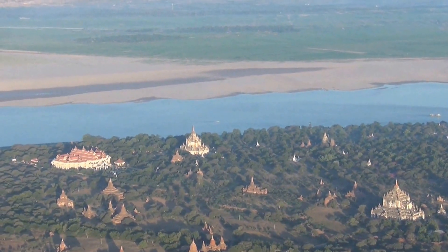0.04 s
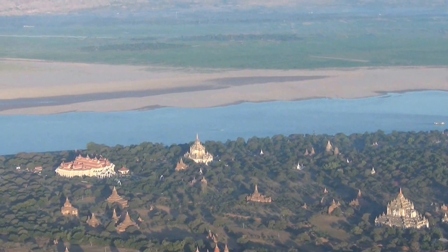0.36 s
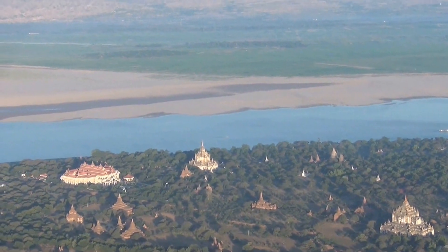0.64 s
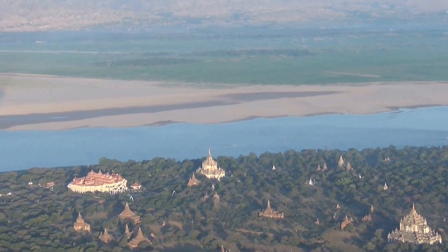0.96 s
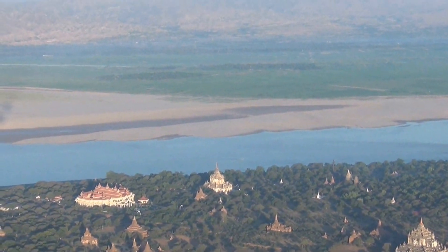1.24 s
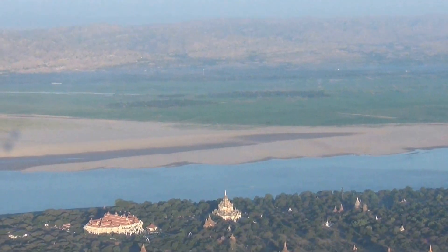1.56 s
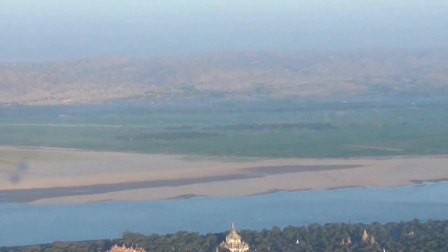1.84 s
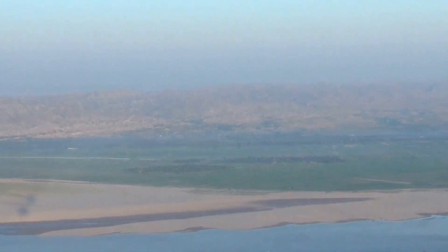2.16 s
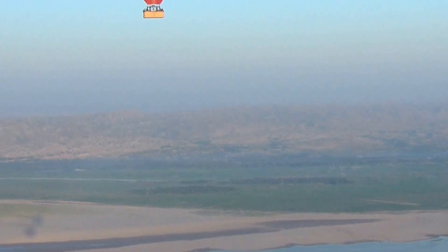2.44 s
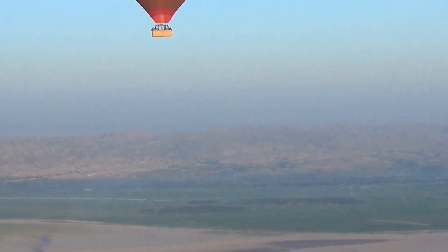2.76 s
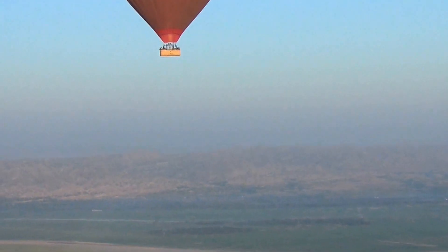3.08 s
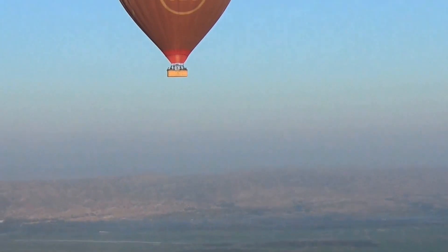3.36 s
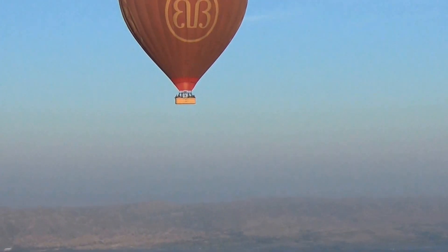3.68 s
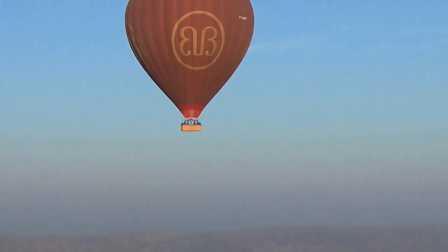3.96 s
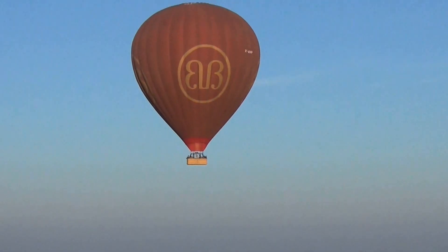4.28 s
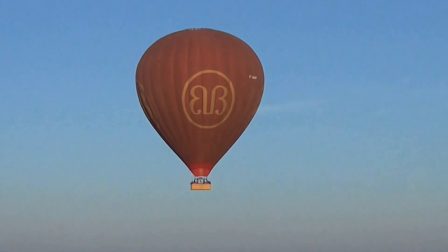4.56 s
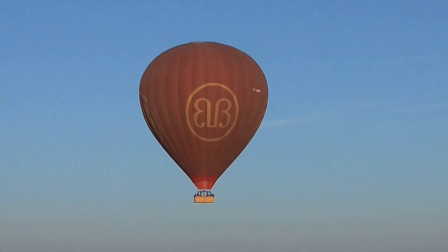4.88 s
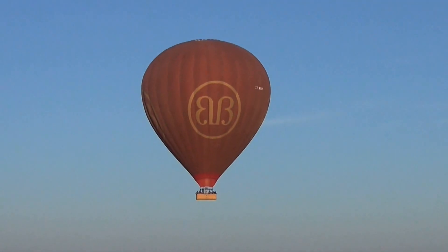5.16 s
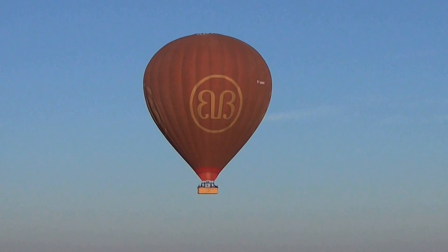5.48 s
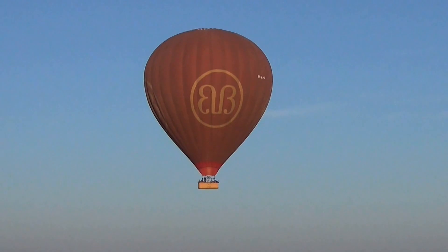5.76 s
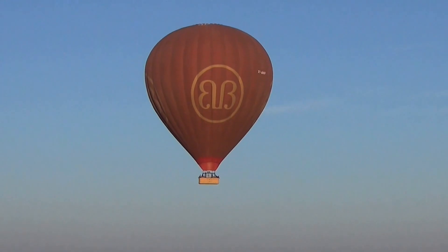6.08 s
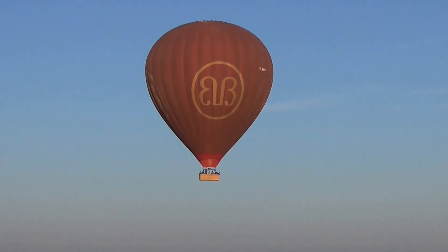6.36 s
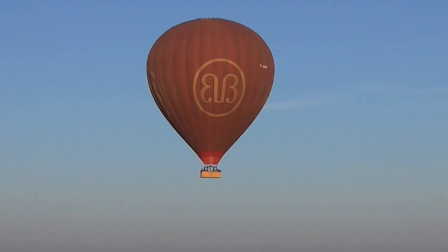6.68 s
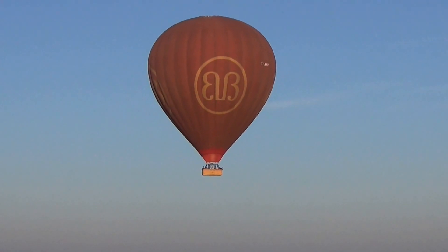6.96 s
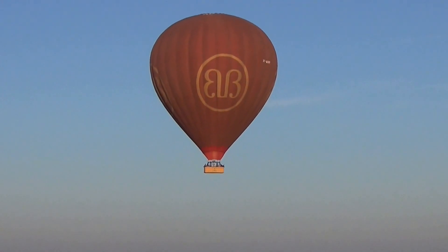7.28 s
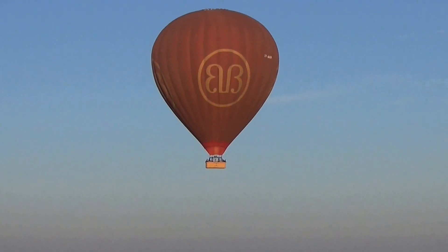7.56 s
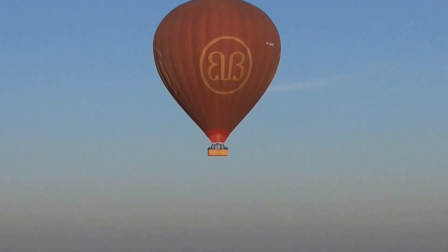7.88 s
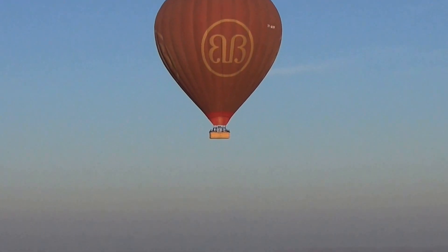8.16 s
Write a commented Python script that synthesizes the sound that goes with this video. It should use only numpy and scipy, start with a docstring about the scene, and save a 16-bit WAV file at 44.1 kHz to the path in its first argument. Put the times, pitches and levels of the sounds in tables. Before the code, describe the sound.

After a brief distant burner blast, a close balloon burner flares up and holds a loud, hissing roar, then dies away.

```python
"""In the basket of a hot-air balloon: quiet air, a faint whistle, then a short blast from a distant
burner on the right. The burner overhead lights with a flare and a whump, and roars on: its swirling
flame rumbles and rushes while propane hisses out of the nozzles. The camera tilts up towards it, and
its gain control (an automatic volume knob) holds the roar down. Near the end the gas valve is eased
back, then shut, and the roar dies away."""
import sys
import numpy as np
from scipy import signal
from scipy.fft import rfft, irfft, next_fast_len
from scipy.io import wavfile
from scipy.ndimage import uniform_filter1d, minimum_filter1d, map_coordinates

SR = 44100
rng = np.random.default_rng(int(sys.argv[2]) if len(sys.argv) > 2 else 0)


def file_out(sig):
    """Save sig as 16-bit WAV at sys.argv[1]."""
    # one column per channel
    cols = np.atleast_2d(sig).T
    # limit, then scale
    lim = np.clip(cols, -1, 1)
    pcm = np.round(lim * 32767).astype(np.int16)
    wavfile.write(sys.argv[1], SR, pcm)


N = 367353

OPEN_S, EASE_S, SHUT_S = 0.91, 7.22, 8.06  # the gas valve snaps open, is eased back, then shuts


def amp(db):
    """Turn decibels into a number to multiply a sound by."""
    return 10 ** (np.asarray(db) / 20)


def unit(pair):
    """Scale a stereo sound so that the average of its two sides has a power of 1."""
    return pair / np.sqrt(np.mean(pair.mean(0) ** 2) + 1e-20)


def since(start_s):
    """Seconds gone by since a moment, 0 before it."""
    return np.maximum(np.arange(N) / SR - start_s, 0)


def onset(at_s, rise_s):
    """A smooth step from 0 to 1, half way up at the given moment."""
    return (1 + np.tanh((np.arange(N) / SR - at_s) / (2 * rise_s))) / 2


def wobble(per_s):
    """A smooth curve through per_s random values a second."""
    points = rng.standard_normal(int(N * per_s / SR) + 4)
    return map_coordinates(points, [np.arange(N) * per_s / SR])


def filtered(x, response):
    """Turn each frequency of a sound up or down by response(hz)."""
    size = next_fast_len(N + 8192)
    return irfft(rfft(x, size) * response(np.fft.rfftfreq(size, 1 / SR)), size)[..., :N]


def split(x, edge_hz, order=6):
    """The low and the high part of a sound; a higher order divides them more sharply."""
    low = filtered(x, lambda hz: 1 / (1 + (hz / edge_hz) ** order))
    return low, x - low


def shifted(x, shift_hz):
    """Slide a band of noise up or down in frequency."""
    spin = np.exp(2j * np.pi * np.cumsum(shift_hz) / SR)
    return np.real(signal.hilbert(x, next_fast_len(N))[:, :N] * spin)


def evened(x, span_s, share):
    """Take a share of the swells and lulls out of a noise."""
    power = np.abs(uniform_filter1d(x.mean(0) ** 2, int(span_s * SR)))
    power = np.abs(uniform_filter1d(power, int(span_s * SR / 2)))
    return unit(x / (power + 1e-6) ** (share / 2))


def turbulence(spectrum):
    """The noise of swirling gas, coloured by a table. Likeness 1: both sides alike; -1: opposite."""
    size = next_fast_len(N + 8192)
    log_hz = np.log(np.fft.rfftfreq(size, 1 / SR) + 1)
    hz, *columns = np.transpose(spectrum)
    left_db, right_db, likeness = [np.interp(log_hz, np.log(hz + 1), c) for c in columns]
    beyond_table = np.abs(log_hz - np.clip(log_hz, np.log(hz[0]), np.log(hz[-1])))
    noise = rfft(rng.standard_normal((2, size))) * np.exp(-10 * beyond_table)
    angle = np.arccos(np.clip(likeness, -1, 1)) / 2
    common, apart = noise * [np.cos(angle), np.sin(angle)]
    sides = [amp(left_db) * (common + apart), amp(right_db) * (common - apart)]
    return unit(irfft(sides, size)[:, :N])


def basket(x, echo_db, longest_s=0.009, drift_s=0.00006, count=6):
    """Weak echoes off the frame and basket colour a sound; their delays drift as the camera moves."""
    hz, t, slices = signal.stft(x, SR, nperseg=2048)
    response = 1
    for delay_s in rng.uniform(longest_s / 10, longest_s, count):
        moving_s = delay_s + drift_s * np.interp(t * SR, np.arange(N), wobble(0.707))
        response = response + amp(echo_db) * np.exp(-2j * np.pi * hz[:, None] * moving_s)
    return signal.istft(slices * response, SR, nperseg=2048)[1][:, :N]


def camera_tilt():
    """How far the camera is raised: 0 faces the ground, 1 faces the burner."""
    # the camera's movement: (time [s], tilt [0..1])
    poses = [(1.7, 0.055), (2.2, 0.3), (2.9, 0.28), (3.45, .68), (4.15, 0.7), (4.55, 1), (5.9, 0.97),
             (6.7, 0.88), (8.1, .85)]
    return np.interp(np.arange(N) / SR, *np.transpose(poses))


def open_air(low_db=-38, hiss_db=-64):
    """A low murmur of air with a thin hiss above it."""
    # the open air: (frequency [Hz], left level [dB], right level [dB], likeness)
    air = [(20, -34, -44, 0.83), (60, -12, -6, 0.96), (161, -9.5, -2.5, 0.987), (300, -16, -11.5, 1),
           (517, -33, -19.5, 0.5), (900, -36, -23, -0.6), (2300, -47, -34, -0.11), (4500, -48, -41, -0.59),
           (5830, -38, -40, 0.29), (11000, -47, -42, 0.51), (12000, -55, -39, 0.64),
           (15500, -56, -42, 0.57)]
    low, hiss = split(turbulence(air), edge_hz=5300)
    return amp(low_db) * unit(low) + amp(hiss_db) * unit(basket(hiss, echo_db=-17))


def whistle(start_s=0.04, length_s=0.43, pitch_hz=1008, sag_hz=26, waver_hz=3, left_db=-64, right_db=-54):
    """One thin, slightly wavering tone from the right; its pitch sags as it swells."""
    swell = np.sin(np.pi * np.minimum(since(start_s) / length_s, 1)) ** 2
    hz = pitch_hz - sag_hz * swell + waver_hz * wobble(38)
    tone = np.sqrt(2) * np.sin(2 * np.pi * np.cumsum(hz) / SR)
    return amp([[left_db], [right_db]]) * swell * tone


def distant_burner(start_s=0.54, grow_s=0.12, stop_s=0.98, flame_db=-34.5, puff_db=4.5, growth_db=11):
    """A short blast: the jets fade in, the rumble starts with a puff, the rush swells with the flame."""
    # a flame some way off: (frequency [Hz], left level [dB], right level [dB], likeness)
    far_flame = [(40, -26, -23, .98), (161, -3, 3, 0.81), (343, -6, -1, 0.99), (484, -24, -12.5, 0.97),
                 (680, -19, -4.5, 0.58), (900, -23, -18, .94), (1200, -25, -14, 0.93),
                 (1410, -26, -19, .98), (1660, -21, -15, 0.54), (2200, -29.5, -25.5, .97),
                 (2500, -28, -22, .97), (2900, -40, -28.5, 0.84), (7000, -42, -41, 0.62),
                 (15000, -68, -63, .33)]
    # gas leaving its nozzles: (frequency [Hz], left level [dB], right level [dB], likeness)
    far_jet = [(5200, -6, -7, .3), (7800, 1, 1, .5), (9200, -4, -2, .4), (11200, -8, -4, .5),
               (12500, -18, -12, .5)]
    young = np.exp(-since(start_s) / grow_s)  # falls from 1 to 0 as the flame grows
    low, high = split(turbulence(far_flame), edge_hz=460)
    rumble = amp(flame_db + puff_db * young) * unit(low)
    rush = amp(flame_db - growth_db * young) * unit(high)
    jet = amp(-58) * onset(at_s=0.36, rise_s=0.06) * turbulence(far_jet)
    fade = amp(-35 * since(stop_s))
    return (onset(start_s, rise_s=0.002) * (rumble + rush) + jet) * fade


def ignition(start_s=0.899, rise_s=0.005, hold_s=0.075, fade_db_per_s=220, whump_hz=118, whump_s=0.3):
    """The gas that has gathered over the pilot light burns off in a bright burst with a low whump."""
    # the gas cloud catching fire: (frequency [Hz], left level [dB], right level [dB], likeness)
    burst = [(36, -6, 1, 0.83), (110, 7, 8, 0.94), (300, 8, 3, 0.92), (590, -20, -5, 0.81),
             (835, -12, -4.5, 0.86), (1110, -10, -5, 0.92), (1580, -18, -12.5, 1), (2160, -24, -20, 1),
             (3160, -27, -14.5, 0.61), (4060, -29, -20.5, 0.76), (9000, -55, -30, .65)]
    t = since(start_s)
    flare = amp(-8 - fade_db_per_s * since(start_s + hold_s)) * turbulence(burst)
    whump = amp(-8 - 60 * t / whump_s) * np.sin(2 * np.pi * whump_hz * t)
    return (1 - np.exp(-t / rise_s)) * (flare + whump)


def valve(shut_db_per_s, lead_s=0):
    """Lets a sound in as the gas valve opens (or lead_s sooner) and fades it once the valve shuts."""
    return onset(OPEN_S - lead_s, rise_s=0.011) * amp(-shut_db_per_s * since(SHUT_S))


def surges(width_s=0.093):
    """The burner briefly surges or sags: smooth bumps in the level of its rumble, rush and hiss."""
    # each surge or sag: (time [s], rumble change [dB], rush change [dB], hiss change [dB])
    bumps = [(2.2, -1, 0.5, 1.5), (4.15, 0, -1, -2), (5.35, 2, 2, 2.5), (6.6, -6.5, -5, -6.5),
             (7.87, 1.5, 3, 1)]
    t = np.arange(N) / SR
    return sum(np.outer(sizes_db, np.exp(-((t - at_s) / width_s) ** 2)) for at_s, *sizes_db in bumps)


def gas_jets(tilt, change_db, fresh_db=2.5, settle_s=1.35, shift_hz=618, sputter_db=0.73):
    """Propane hisses and sputters out of the nozzles, with a sizzle that grows as the camera tilts up."""
    # gas leaving the nozzles: (frequency [Hz], left level [dB], right level [dB], likeness)
    nozzles = [(2100, -17, -7.5, -0.72), (2800, -8.5, -1, -1.08), (3970, -15.5, -5, -0.5),
               (4450, -14.5, -9, -0.77), (5420, -4, -5.5, 0.57), (6000, 0, -1.5, 0.85),
               (7400, -3.5, -4, 0.73), (9350, -10.5, -6.5, -0.079), (11000, -7.5, -1.5, 0.59),
               (11700, -18, -6.5, 0.46), (13000, -23, -2.5, 0.8), (15500, -32, -4, 0.61)]
    # the shrillest part of the jets: (frequency [Hz], left level [dB], right level [dB], likeness)
    shrill = [(7100, -11.5, -15, .6), (10400, -10.5, -12.5, 0.2), (11270, -13, -1.5, 0.46),
              (11700, -26, -1.5, 0.61), (12500, -12, -2.5, 0.87), (14400, -28, -6, 0.97),
              (16000, -38, -14, .7)]
    early_db = fresh_db * np.exp(-since(OPEN_S) / settle_s)  # louder until the hose pressure settles
    hiss = amp(-29 + 3 * tilt + early_db) * turbulence(nozzles)
    raised_hz = shift_hz * (1 - tilt ** 2)  # the sizzle sits higher when the camera faces the ground
    sizzle = amp(-34.5 + 11 * tilt ** 0.75) * shifted(turbulence(shrill), raised_hz)
    return (hiss + sizzle) * amp(change_db + sputter_db * wobble(70))


def flame_rush(tilt, change_db, eased_db, flicker_db=0.16):
    """Small swirls in the flame make a rushing noise that flickers slightly."""
    # the small swirls: (frequency [Hz], left level [dB], right level [dB], likeness)
    swirls = [(420, -32, -23, 0.97), (578, 3.5, 1, 1), (685, -7, -4.5, 1), (820, -10, -0.2, 1),
              (1000, -18, -2, 0.76), (1236, -16, -5.5, 0.75), (1385, -32, -10.5, -0.099),
              (1830, -25.5, -11.5, -0.72), (2330, -41, -19, 0.028), (3060, -46, -20.5, -0.21),
              (4660, -44, -25, 0.13)]
    coarse, fine = split(turbulence(swirls), edge_hz=1280, order=14)
    # the finest swirls are heard best when the microphone faces them, and need the full flow of gas
    rush = coarse + amp(-0.8 + tilt + eased_db) * fine
    return amp(-25 + 9.5 * tilt + change_db + flicker_db * wobble(60)) * rush


def flame_rumble(tilt, change_db):
    """The body of the flame rumbles; a steady flow of fuel keeps its power nearly even."""
    # the body of the flame: (frequency [Hz], left level [dB], right level [dB], likeness)
    body = [(20, -28, -36, .5), (35, -21, -28, 0.91), (58, -9.5, -13, 0.83), (84, -12, -9.5, 0.99),
            (145.7, -3, 0.5, 1), (221, -5, -3, 0.98), (271, 0, 1.5, 1), (301, -4.5, -3, 0.99),
            (429, -6.5, -5, 1), (587, -15, -11, 0.94), (691, -34, -18.5, 1), (1100, -80, -30.5, 0.81)]
    return amp(-5 + 3 * tilt + change_db) * evened(turbulence(body), span_s=0.014, share=0.33)


def burner(wander_db=0.36, ease_db_per_s=5):
    """Gas jets feed the flame overhead; their hiss starts just before its roar and dies faster."""
    tilt = camera_tilt()
    rumble_db, rush_db, hiss_db = surges()
    eased_db = -ease_db_per_s * since(EASE_S)
    drift_db = wander_db * wobble(4)
    roar = flame_rumble(tilt, rumble_db) + flame_rush(tilt, rush_db + drift_db, eased_db)
    hiss = valve(shut_db_per_s=65, lead_s=0.006) * gas_jets(tilt, hiss_db + eased_db + drift_db)
    return valve(shut_db_per_s=56) * roar + basket(hiss, echo_db=-22.5)


def scene():
    """Everything that reaches the left and right microphones."""
    return burner() + ignition() + distant_burner() + open_air() + whistle()


def gain_control(x, ceiling_db=-6.5, strength=0.83, headroom_db=3, settle_s=0.18, release_db_per_s=100):
    """Each peak above the ceiling turns the volume down at once; it then comes back up."""
    over_db = 20 * np.log10(np.abs(x).max(0) + 1e-9) - ceiling_db
    # after quiet the ceiling is a little higher; it settles once the sound stays loud
    loud = -minimum_filter1d(-np.clip(over_db - 5, 0, 1), SR // 10)
    step = 1 / (settle_s * SR)
    settled = signal.lfilter([step], [1, step - 1], loud)
    excess_db = strength * np.maximum(over_db - headroom_db * (1 - settled), 0)
    recovery_db = release_db_per_s * np.arange(N) / SR
    cut_db = np.maximum.accumulate(excess_db + recovery_db) - recovery_db
    return x * amp(-uniform_filter1d(cut_db, int(0.004 * SR)))  # smoothed over 4 ms


def record(dry, top_hz=15850):
    """The camera holds loud sounds down and cuts off the very highest treble."""
    return filtered(gain_control(dry), lambda hz: hz < top_hz)


dry = scene()
out = record(dry)
file_out(out)
```